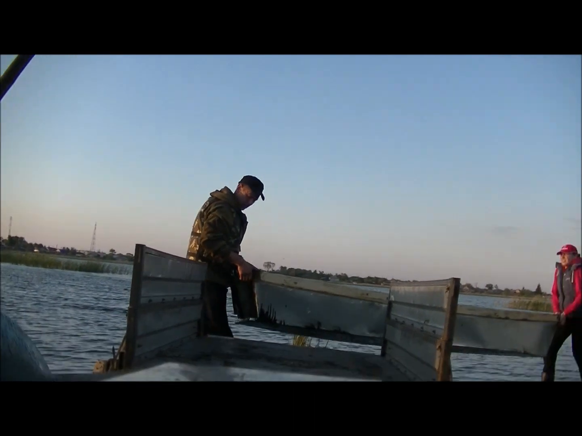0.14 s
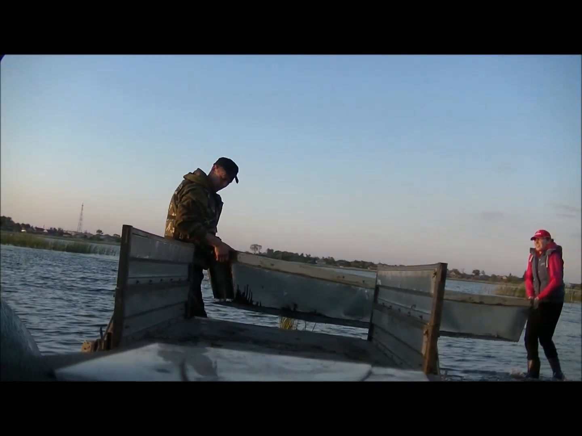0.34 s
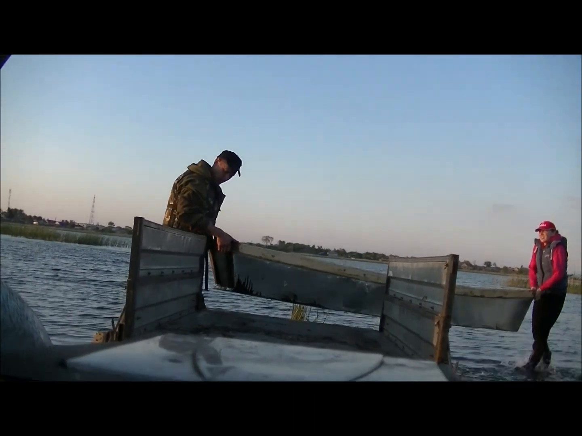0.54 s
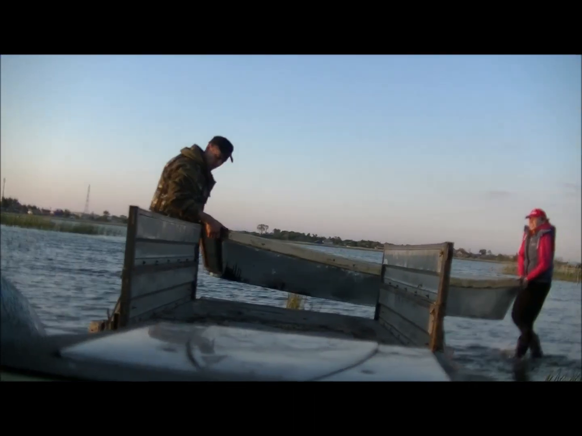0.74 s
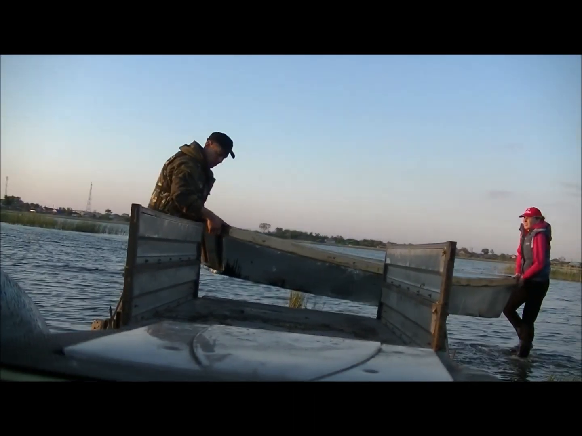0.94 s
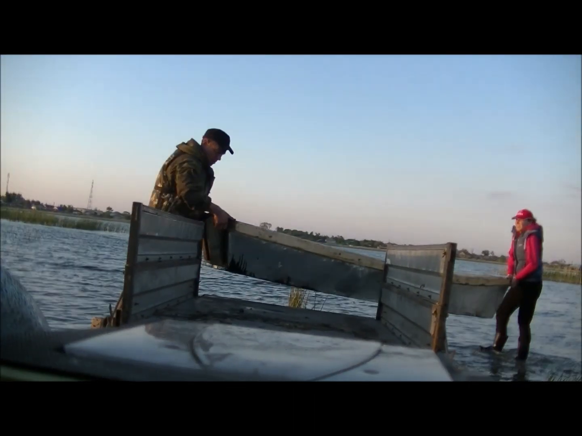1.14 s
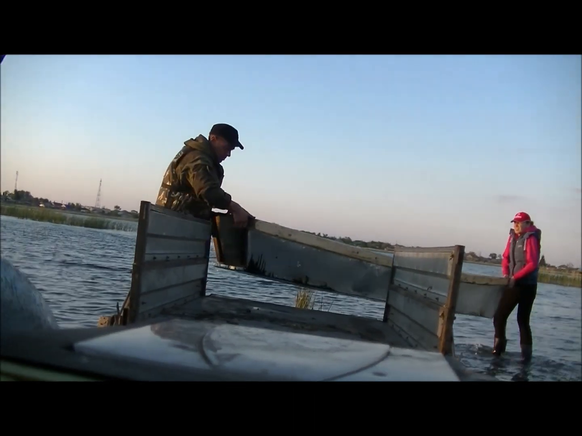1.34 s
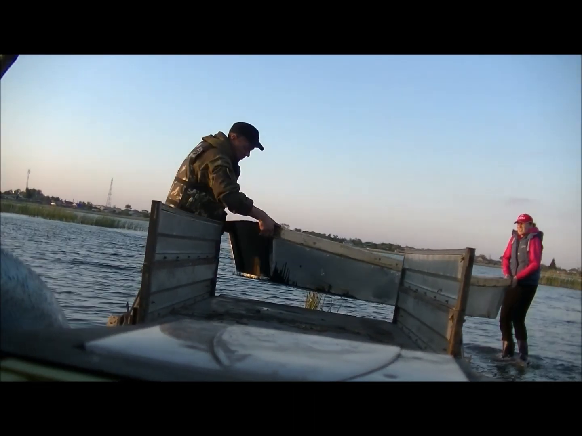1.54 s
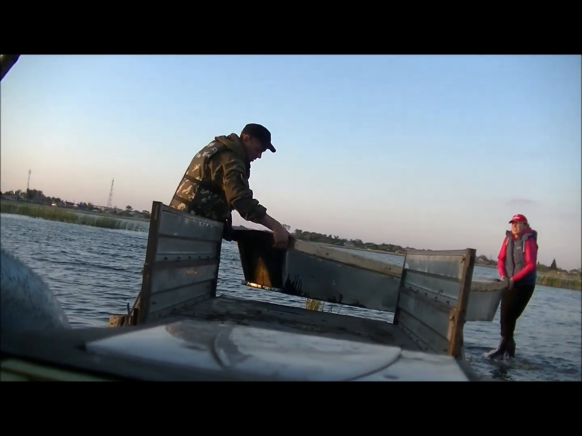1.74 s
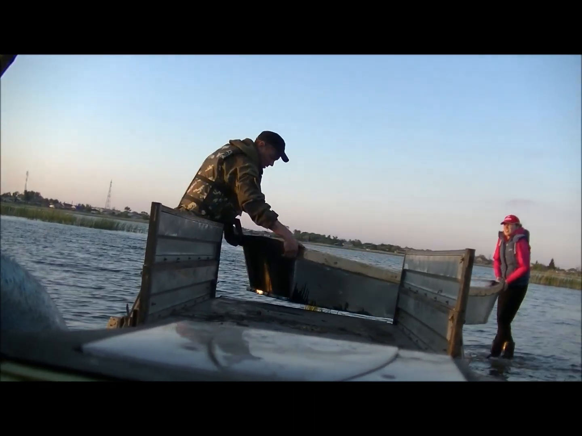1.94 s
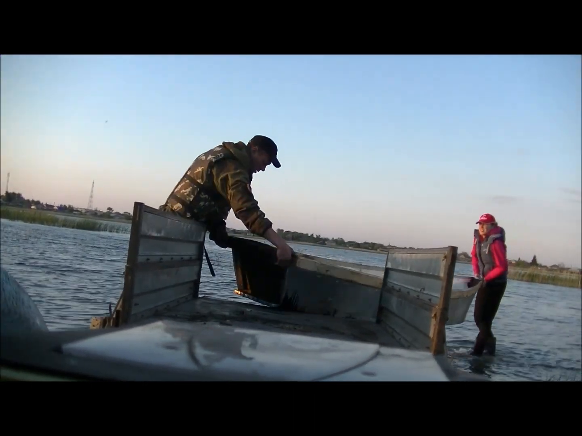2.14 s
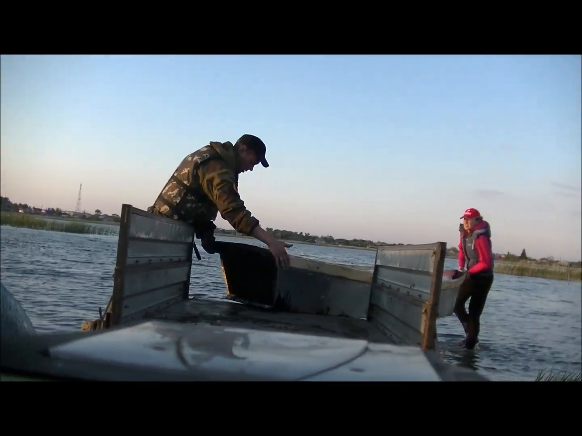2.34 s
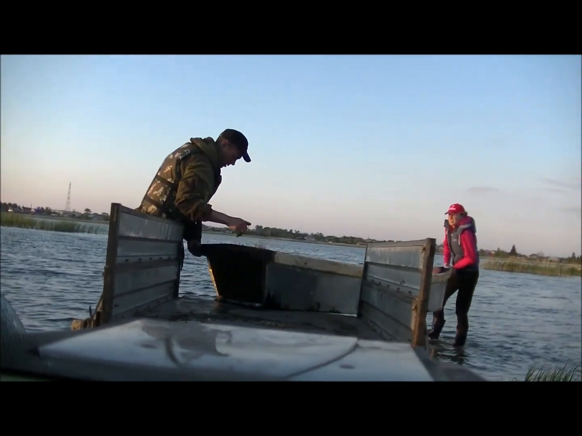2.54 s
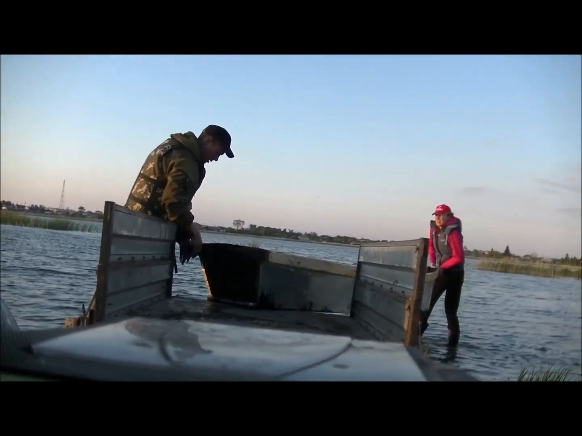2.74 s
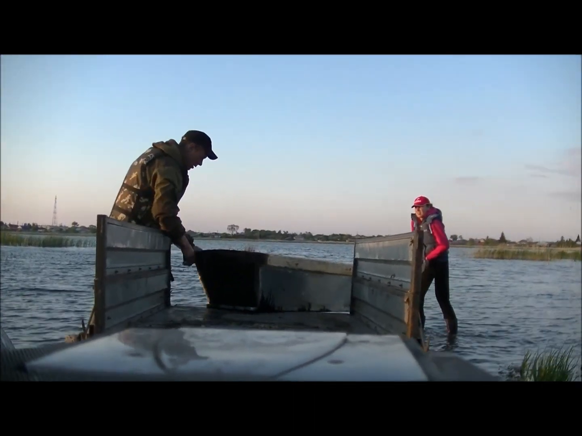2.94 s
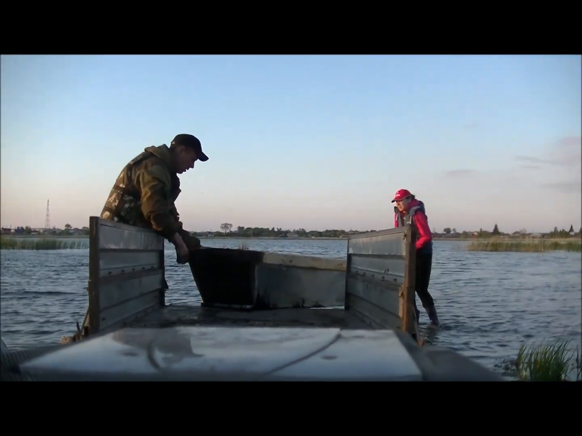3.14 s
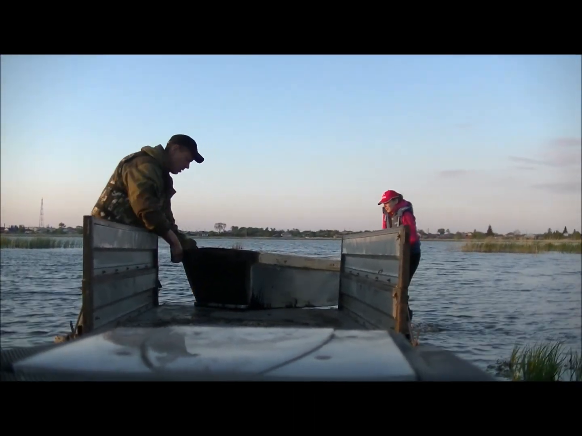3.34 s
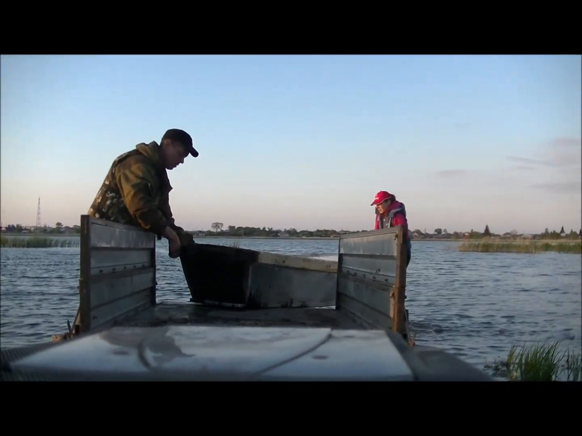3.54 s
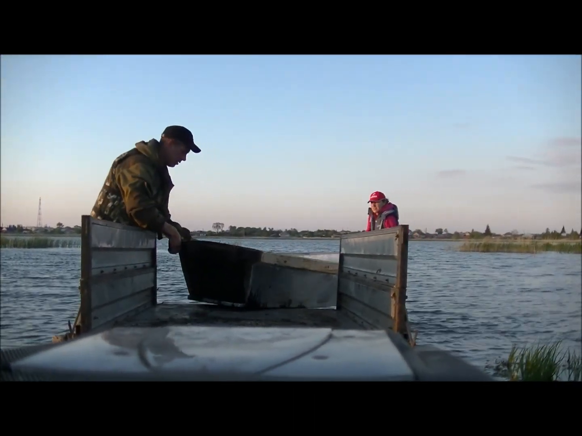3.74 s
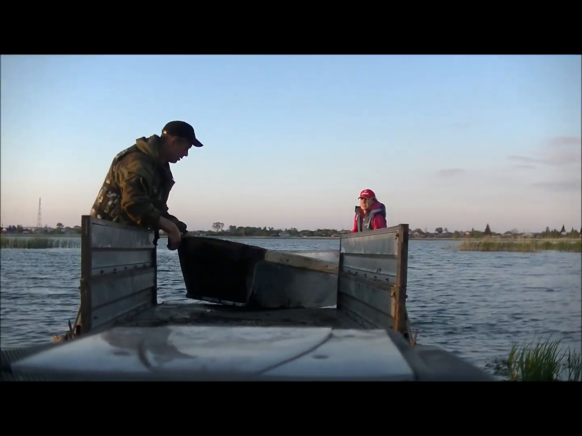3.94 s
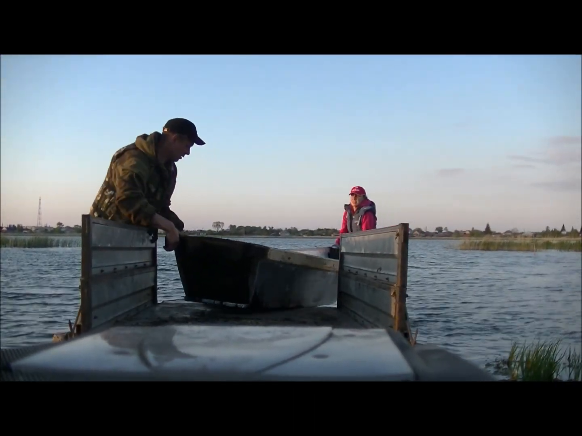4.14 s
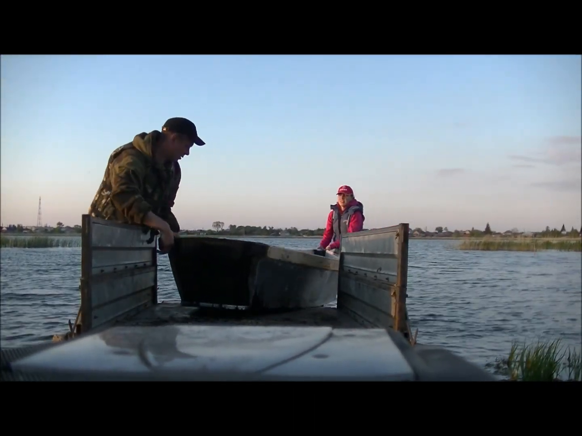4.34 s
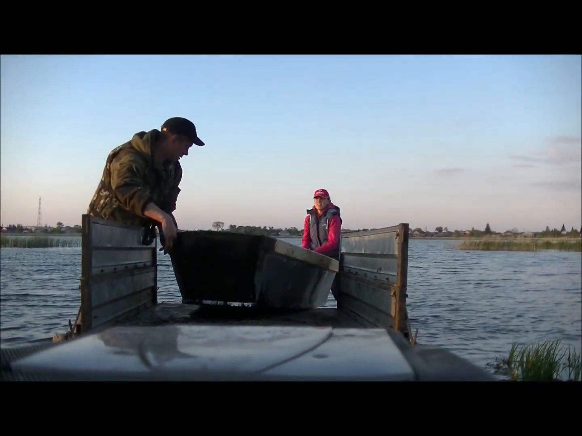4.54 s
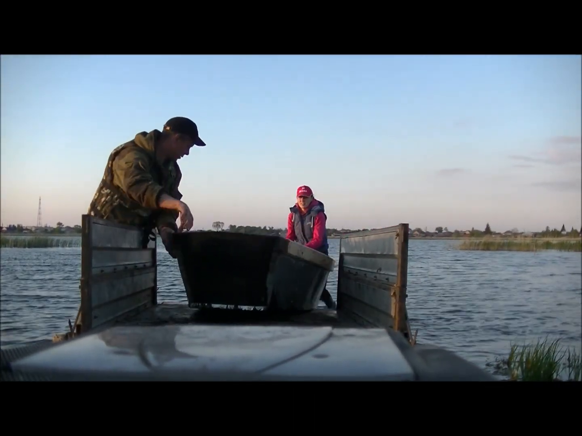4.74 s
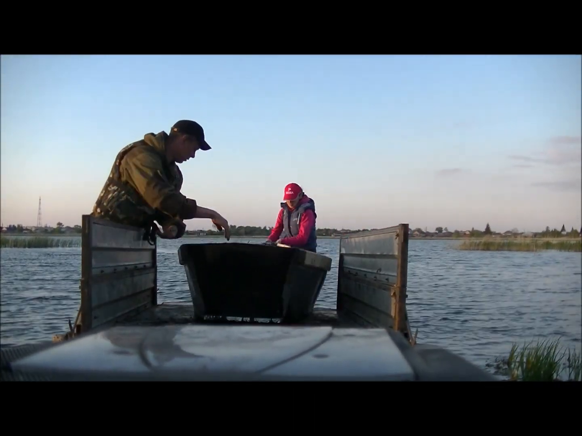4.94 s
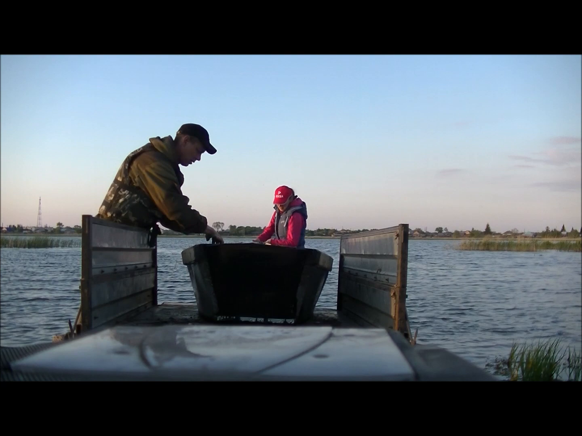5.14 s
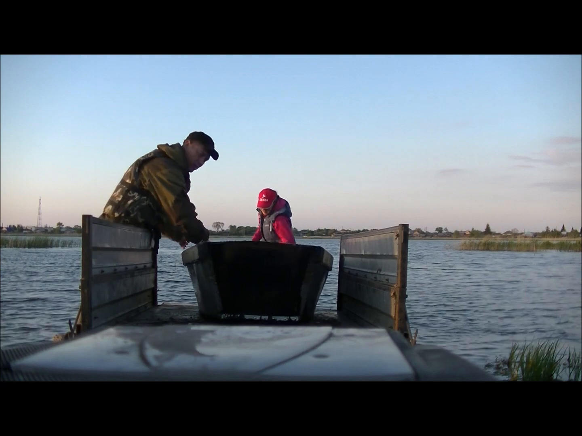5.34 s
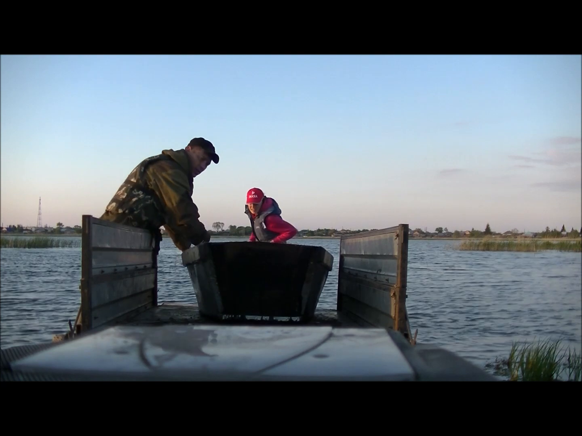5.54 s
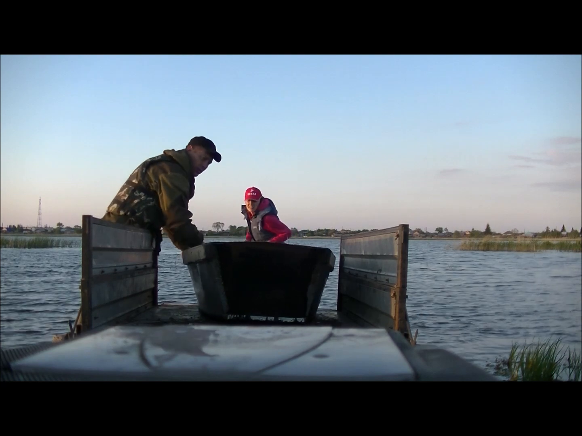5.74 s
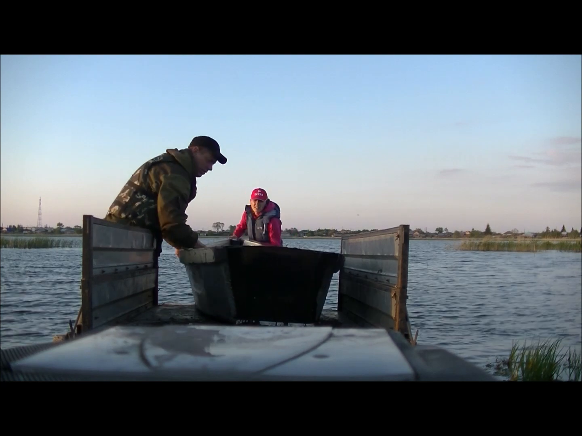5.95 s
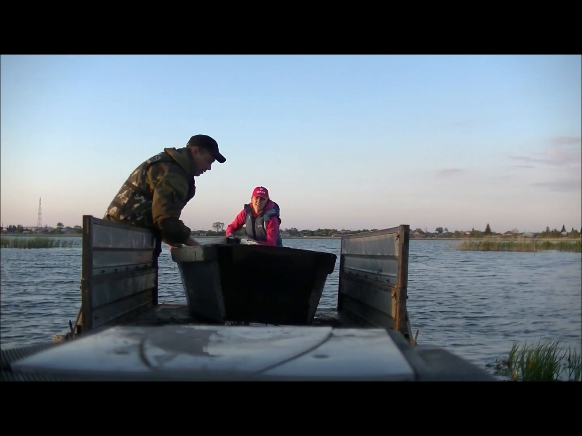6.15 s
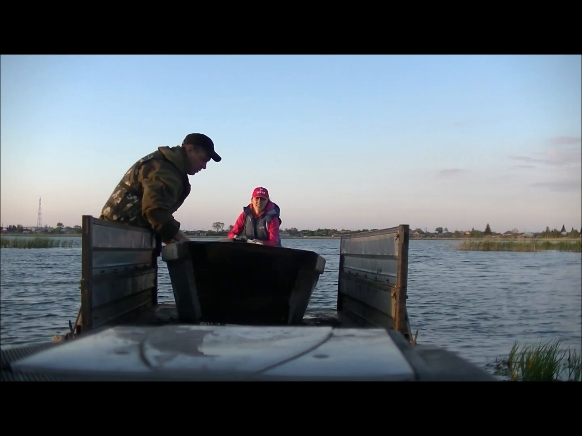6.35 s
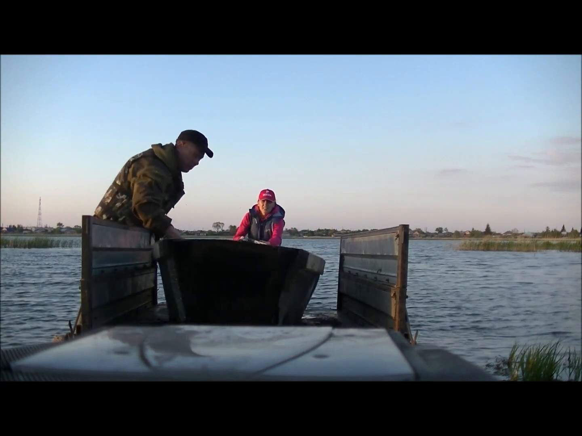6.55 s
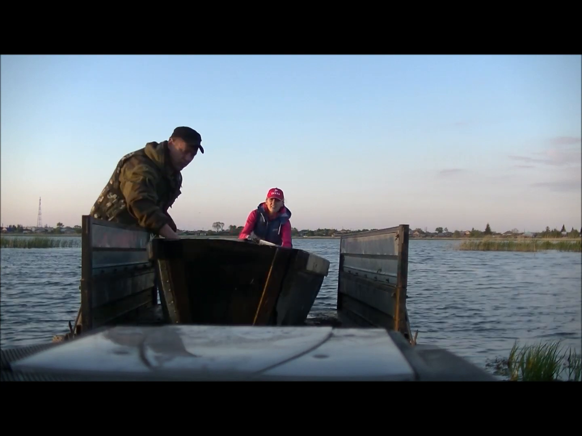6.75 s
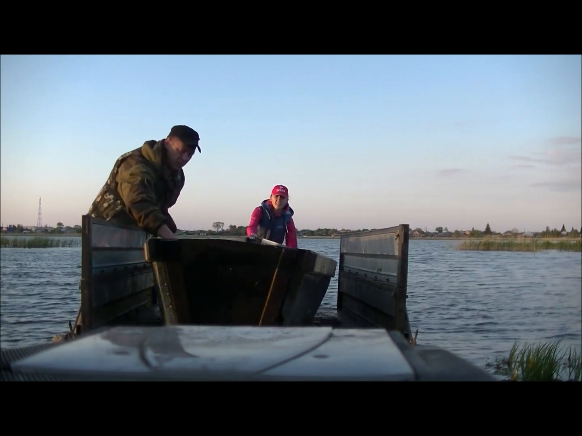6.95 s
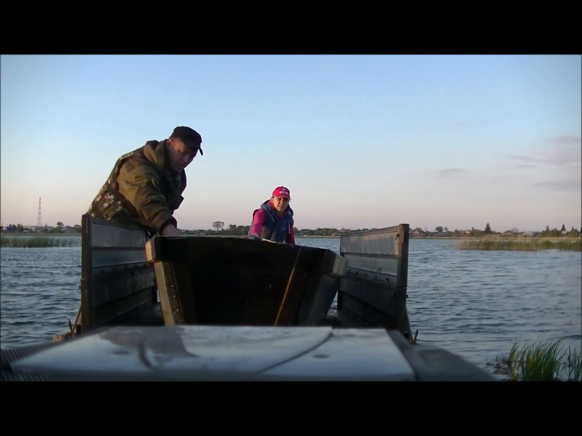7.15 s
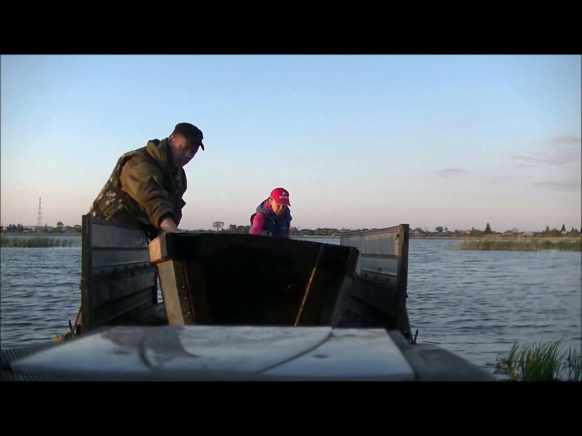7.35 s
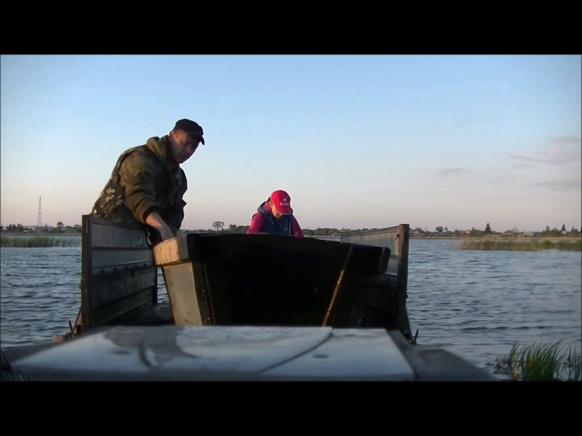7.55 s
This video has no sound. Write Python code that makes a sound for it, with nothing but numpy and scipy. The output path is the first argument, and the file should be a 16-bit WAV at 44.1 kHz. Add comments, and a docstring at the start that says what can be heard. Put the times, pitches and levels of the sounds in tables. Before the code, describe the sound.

Outdoors in shallow water, surges splash and gulp around a large hollow box. At about two seconds it hits a metal floor with a loud clank and clatter. Short mid-high squeaks follow as the water fades, then knocks and gritty scraping in two pulls, growing heavier until loud hollow bumps and a ragged rubbing groan end it. Close stereo microphone.

```python
"""A large hollow box, hauled out of shallow water, is dragged over the metal floor of a boat: crushed grit
drives its panel resonances, it grinds nearer and ends in a loud rubbing groan of ragged friction tones.
Before that, water sloshes as coloured grains and ringing bubbles, the box drops with a clatter of noise bursts,
and its bottom squeaks in short gliding slips. Two microphone channels, less alike in the middle register."""
import sys
import numpy as np
from scipy import signal
from scipy.fft import rfft, irfft, next_fast_len
from scipy.io import wavfile
from scipy.ndimage import uniform_filter1d

SR = 44100
rng = np.random.default_rng(int(sys.argv[2]) if len(sys.argv) > 2 else 0)


def generate_wav(sig):
    """Save sig (samples, or channels by samples) to the path in sys.argv[1] as 16-bit PCM at SR."""
    pcm = np.round(np.clip(np.atleast_2d(sig).T, -1, 1) * 32767).astype(np.int16)
    wavfile.write(sys.argv[1], SR, pcm)


N = 338908
TIME = np.arange(N) / SR

# Source levels in the tables are relative: each source's function trims them.
# likeness of the left and right microphone: f/Hz, likeness (0 to 1)
CHANNEL_LIKENESS = [(60, .6), (150, 0.97), (350, 0.94), (1000, 0.89), (2200, 0.82), (4500, 0.83),
                    (7000, 0.96), (10000, 1)]
# lean of the stereo picture: f/Hz, left minus right level/dB
CHANNEL_LEAN = [(60, .5), (240, 0), (480, 2), (950, 3.5), (1900, -2), (3800, -1), (6000, 0)]
CUTOFF_HZ = 15800

# spectrum of the water: f/Hz, level/dB per Hz
WATER_SPECTRUM = [(35, -70), (60, -47), (469, -15), (566, -12.5), (785, -7.5), (903, -10), (1380, 1),
                  (1740, 2), (1910, 3.5), (2470, 1.5), (3190, 3.5), (4320, 2.5), (5860, -14), (6740, -15.5),
                  (16000, -30.5)]
# surges against box and legs: crest t/s, rise t/s, fall t/s, slosh level/dB, splash level/dB
WATER_SURGES = [(0.0, .05, 0.19, -69, -45), (0.11, 0.076, 0.072, -52.5, -44.5),
                (0.23, 0.059, 0.058, -67, -38), (0.34, 0.052, 0.29, -51, -50.5),
                (0.51, 0.055, 0.11, -54, -40), (0.64, 0.075, 0.24, -44, -48.5),
                (0.84, 0.38, 0.2, -59, -45.5), (1.0, 0.082, 0.19, -55, -43.5),
                (1.17, 0.23, 0.19, -64, -44.5), (1.34, 0.071, 0.033, -58, -43.5),
                (1.405, 0.031, 0.02, -41.5, -38.5), (1.567, 0.0091, 0.19, -51, -44.5),
                (1.77, 0.075, 0.86, -50, -42), (2.02, 0.11, 0.38, -43.5, -47),
                (2.43, 0.15, 0.23, -42.5, -46), (2.76, 0.095, 0.095, -43, -47.5),
                (3.02, 0.19, 0.11, -51, -50), (3.36, 0.3, .3, -45.5, -46), (3.62, 0.091, .15, -52, -52)]
SURGE_DROP_DB = 11.5   # below the crest, one rise before and one fall after it
LAPPING_DB, LAPPING_END_S = -57, 3.78   # small waves between the surges; all water has faded by the end
SPRAY_DB, SPRAY_FOLLOWS = -53.5, 0.62   # spray at the typical splash level; share of the splash's dB swing
TYPICAL_SPLASH_DB = -44.5
# single gulps of water: t/s, level/dB, starting f/Hz
WATER_PLOPS = [(0.091, -36, 1434), (0.107, -36, 1990), (0.154, -36, 1347), (0.158, -39, 970),
               (0.316, -39, 726), (0.438, -40, 720), (0.629, -38, 1144), (0.654, -40, 1136),
               (0.682, -40, 1300), (0.8, -43, 1040), (0.839, -42, 980), (0.985, -43.5, 780),
               (1.374, -36, 1365), (1.42, -41, 1380), (1.544, -39, 2240), (1.562, -30, 782),
               (1.585, -35, 1355), (1.606, -41, 1880), (1.634, -31, 1500)]

# small hard ticks: t/s, level/dB, centre f/Hz, t60/s
HARD_TICKS = [(0.8121, -29, 2570, 0.009), (1.126, -21, 4600, 0.012), (1.127, -30, 11000, 0.008),
              (1.183, -24, 4310, 0.015), (1.6922, -23, 4500, 0.014), (1.819, -21, 4800, 0.0075),
              (2.064, 3, 3680, 0.015), (2.7806, -13, 3460, 0.012), (4.034, -15, 2800, 0.009),
              (5.72, -28, 2780, 0.015)]
SNAP_S, SNAP_DB = 1.0895, -7.5   # one sharp snap of a hard edge
# damped modes of the snap: f/Hz, level/dB, t60/s
SNAP_PARTIALS = [(1510, -13, 0.0059), (2900, -12, .003), (5200, -6.5, 0.0031), (6100, -9, .0025),
                 (11500, -19, .002)]
# spectrum of the blows: f/Hz, level/dB per Hz
KNOCK_SPECTRUM = [(71, -63), (120, -28), (272, -25), (314, -13.5), (473, -6), (1070, -4), (1580, 2),
                  (1680, 2), (2380, 1.5), (3820, -2.5), (5630, -25.5), (7200, -25.5), (8310, -34),
                  (13000, -39.5), (16000, -47)]
# blows of the box on the floor: t/s, level/dB, bass level/dB, treble level/dB, t60/s
FLOOR_BLOWS = [(0.135, -41, 2, -20, 0.061), (0.221, -28.5, -26, -11, 0.15), (0.949, -29, -29, -14, 0.29),
               (1.392, -32.5, -10, -5, 0.081), (1.553, -43, 6, -20, 0.06), (1.923, -18.5, -27, -15, 0.2),
               (2.062, -5, -14, -12, 0.12), (2.103, -12, -12, -27, 0.21), (2.136, -21, -9, -17, 0.19),
               (2.523, -16.5, -16, -38, 0.28), (2.532, -14, -17.5, -31, 0.17),
               (3.527, -21.5, -22, -40, 0.26), (3.764, -25.5, -16, -22, 0.13),
               (3.832, -16.5, -24, -26, 0.11), (3.939, -15.5, -19, -22, 0.15),
               (4.014, -22.5, -12, -15, 0.2), (4.054, -19, -18, -36, 0.15), (4.104, -13.5, -29, -29, 0.092),
               (4.164, -19.5, -12, -12, 0.12), (4.291, -25, -16, -7, 0.13), (4.596, -21.5, -15, -9.5, 0.22),
               (4.965, -24.5, -8, -7.5, 0.63), (5.05, -22.5, -5, -18, 0.066), (5.19, -33, -1.5, -30, 0.17),
               (5.315, -35, -2.5, -10, 0.19), (5.604, -49, 5.5, -23, 0.18), (6.182, -24, -17, -11, 0.12),
               (6.545, -24, -8, -22, 0.09), (6.716, -18.5, -34, -5, 0.26), (6.815, -19.5, -10, -23, 0.13),
               (6.971, -18, -18, -19, 0.11), (7.075, -16, -16, -19, 0.13), (7.2, -11.5, -23, -28, 0.12),
               (7.272, -13.5, -3.5, -15, 0.23)]
# hollow bumps of the box wall as it rides over ridges, and near the end the short squawk pulses of the loaded
# rubbing groan: t/s, level/dB, f/Hz, t60/s
HOLLOW_BUMPS = [(2.998, -34.5, 800, 0.022), (5.191, -27, 641, 0.09), (5.193, -26.5, 1500, 0.064),
                (6.252, -26, 754, 0.04), (6.472, -20.5, 761, 0.026), (6.55, -26.5, 614, 0.064),
                (6.725, -26, 590, 0.062), (6.82, -24.5, 554, 0.089), (6.966, -16, 813, 0.031),
                (6.973, -13, 538, 0.057), (7.076, -18, 652, 0.06), (7.181, -18.5, 797, 0.06),
                (7.199, -12, 803, 0.05), (7.266, -13.5, 950, 0.068), (7.273, -6, 800, 0.026),
                (7.282, -12, 1180, 0.05), (7.333, -19, 900, 0.033), (7.386, -7, 1294, 0.065),
                (7.459, -11, 1230, 0.063), (7.471, -8.5, 1090, 0.036), (7.486, -9.5, 1066, 0.043),
                (7.635, -20.5, 808, 0.049)]

# single grains dragged along the metal: t/s, length t/s, centre f/Hz, level/dB
GRAIN_SCRATCHES = [(2.447, 0.017, 10700, -50), (3.374, 0.032, 4430, -40.5), (3.739, 0.014, 1100, -39.5),
                   (3.919, .012, 3000, -36), (4.027, 0.01, 10500, -47), (4.058, .01, 2850, -35),
                   (4.23, 0.11, 11000, -48.5), (4.232, .025, 4500, -39.5), (4.294, .006, 2700, -35),
                   (4.324, .012, 4500, -40), (4.366, .008, 2740, -39), (4.41, 0.027, 2500, -41),
                   (4.565, .008, 3470, -40), (4.596, 0.016, 2440, -33), (4.832, .012, 2550, -37),
                   (5.053, .02, 2300, -37), (5.3, 0.039, 2700, -46), (5.987, .1, 8500, -42.5),
                   (5.993, .012, 2200, -38), (6.296, .012, 3000, -39), (6.642, .025, 2610, -34.5),
                   (6.713, 0.031, 6460, -38), (6.72, .03, 2620, -32.5), (6.85, 0.045, 4750, -34.5),
                   (6.892, 0.016, 6300, -41), (6.969, .008, 3510, -33), (7.198, .008, 2450, -28)]
# thin high squeals: start t/s, length t/s, top f/Hz, level/dB
EDGE_SQUEALS = [(1.326, 0.144, 5800, -52), (1.31, 0.163, 1930, -50), (4.996, .055, 4590, -41),
                (6.18, 0.041, 4650, -34.5)]
SQUEAL_ARCH = 0.12   # share by which the pitch lies lower at both ends

# slips of the box bottom: t/s, length t/s, starting f/Hz, level/dB,
# middle overtones re slip level/dB, top overtone re slip level/dB
BOTTOM_SLIPS = [(2.35, 0.091, 1375, -27, -13, -30), (2.494, 0.003, 1377, -26.5, -19, -32),
                (2.58, 0.035, 1347, -28.5, -22, -40), (2.694, 0.0064, 1325, -27.5, -17.5, -19.5),
                (2.79, 0.012, 1350, -33, -21, -28), (2.811, 0.0046, 1380, -30.5, -13.5, -28),
                (2.882, 0.015, 1338, -25.5, -14, -25), (2.92, 0.013, 1324, -31.5, -12, -24),
                (3.103, 0.026, 1347, -24.5, -14, -29), (3.15, 0.027, 1313, -31, -11, -15),
                (3.195, 0.0072, 1350, -32, -14, -34), (3.349, 0.005, 1382, -31, -13, -26),
                (3.37, 0.013, 1341, -26, -16.5, -28), (3.406, .008, 1345, -31, -16, -28),
                (3.45, 0.023, 1362, -41, -13, -28), (4.206, 0.0065, 1345, -35, -30, -35),
                (4.288, 0.021, 1364, -38, -13, -35), (4.622, 0.037, 1390, -39, -13, -30),
                (4.701, .01, 1403, -38, -14, -30), (4.741, 0.017, 1345, -30.5, -16.5, -30),
                (4.795, 0.056, 1353, -32.5, -12, -23), (4.878, 0.045, 1304, -37.5, -3.5, -15),
                (5.76, 0.017, 1382, -41.5, -6, -26), (5.904, 0.029, 1360, -42.5, -3, -25)]
# where the wall radiates each overtone: low f/Hz, high f/Hz
OVERTONE_BANDS = [(2400, 3000), (3650, 4350), (5050, 5300)]
SQUEAK_ATTACK_S, SQUEAK_RELEASE_T60_S = 0.015, 0.14
SQUEAK_SAG_HZ_PER_S, SQUEAK_FADE_DB_PER_S = 469, 9   # a slip loses pitch and level as it slows
SQUEAK_BREAK_HZ, SQUEAK_BREAK_S = 42, .012   # a slip breaks loose sharp and quickly settles
SQUEAK_CLEAN_S = 0.037   # time over which a clean slip turns fully ragged
# rough rubs under load: t/s, length t/s, starting f/Hz, glide in Hz per s, level/dB,
# octave re rub level/dB, panel re rub level/dB
LOADED_RUBS = [(3.837, 0.0082, 1514, 0, -24.5, -3, -30), (3.938, 0.01, 1542, 0, -26.5, 3, -17),
               (4.014, 0.098, 1495, 900, -30, -4, -12), (4.167, 0.012, 1620, 0, -32, -12, -18),
               (7.302, 0.022, 1147, 7000.5, -16, -21, -10.5), (7.355, .015, 1334, 0, -20.5, -15, -4.5),
               (7.383, 0.012, 1327, -6000, -10, -24, -17.5), (7.417, 0.024, 1244, 9000, -19, -16, -27),
               (7.452, .04, 1384, -9000, -15.5, -11, -9.5), (7.501, 0.018, 1074, -400, -18, 5, -27),
               (7.546, 0.02, 1055, -700, -26, -14, -12), (7.636, 0.034, 842, -1200, -26.5, -2, -10)]
RUB_ATTACK_S, RUB_RELEASE_T60_S = .013, 0.15

# boom of the box bottom, whose pitch shifts with the point that bears the load: t/s, f/Hz, level/dB
BOTTOM_BOOM = [(4.33, 621, -56), (4.41, 612, -41), (4.55, 689, -46), (4.7, 648, -53), (4.94, 660, -63),
               (4.99, 655, -42.5), (5.17, 634, -46), (5.21, 635.2, -42), (5.28, 645.6, -51),
               (5.45, 640, -58), (5.8, 639, -66), (6.02, 670, -45), (6.3, 650.3, -46), (6.55, 611, -42),
               (6.85, 560.3, -38.5), (7.04, 560, -41), (7.09, 635.5, -29), (7.16, 648, -30),
               (7.24, 696, -46)]
# spectrum of the dragging: f/Hz, level/dB per Hz
DRAG_SPECTRUM = [(59, -73), (100, -49), (153, -27), (302, -22), (381, -12.5), (634, -5), (950, -9.5),
                 (1330, -7.5), (2420, -4), (3250, -10), (4380, -8), (5770, -20.5), (9020, -25),
                 (10700, -24), (16000, -35)]
# resonances of box and floor: f/Hz, width f/Hz, lift level/dB
PANEL_MODES = [(154, 9.2, 4), (449.5, 7.4, -1), (538, 8.8, -7), (636, 66, 4), (782, 12, 4.5), (871, 33, 4),
               (1070, 7.1, -3), (1257, 18, 5.5), (1345, 21, 8), (1470, 180, 4.5), (1843, 15, 7),
               (2550, 26, 5), (3680, 30, -4), (4500, 1100, 1), (10560, 430, 4.5)]
# two long pulls over the floor with a rest between: t/s, rasp level/dB, grit level/dB
HAUL_LEVELS = [(3.55, -48.5, -61), (3.914, -36, -49), (4.17, -41.5, -50.5), (4.41, -38, -42.5),
               (4.8, -39.5, -49.5), (4.96, -44, -51), (5.08, -35, -47.5), (5.2, -44, -47.5),
               (5.576, -54, -61.5), (5.86, -48, -58), (6.0, -35, -44.5), (6.274, -35.5, -40),
               (6.4, -37, -42.5), (6.62, -32.5, -39), (6.79, -33.5, -44), (6.96, -31.5, -39.5),
               (7.19, -24.5, -30.5), (7.33, -33.5, -40.5), (7.43, -33, -43), (7.68, -34.5, -44)]
# the box judders while it tips onto the floor, less once it slides flat: t/s, swing level/dB
LOAD_JUDDER = [(3.6, 2), (4.3, 2.0), (5.3, 2), (5.9, 0.5), (6.7, .8), (7.2, 1)]
# the panels drone in step with the rasp, and gain weight as the box comes nearer
DRONE_RE_RASP_DB, DRONE_GAIN_DB_PER_S, DRONE_REFERENCE_S = -5.0, 0.3, 6.3
# clusters of catching grains sing briefly in the sheet
STREAK_RE_RASP_DB, STREAK_SWING_DB, STREAKS_PER_S = -4.5, 8, 22


def from_db(db):
    """Level in dB to amplitude."""
    return 10 ** (np.asarray(db) / 20)


def rms_one(x):
    """A signal scaled to rms 1."""
    return x / np.sqrt(np.mean(x ** 2) + 1e-20)


def in_time(rows, t=TIME):
    """Columns of a curve at the times t."""
    s, *columns = np.transpose(rows)
    return [np.interp(t, s, c) for c in columns]


def during(rows, fade, t=TIME):
    """One while a curve lasts, fading outside it."""
    inside = np.minimum(t - rows[0][0], rows[-1][0] - t)
    return np.clip(1 + inside / fade, 0, 1)


def at_hz(points, hz):
    """A spectrum read on a log-frequency axis."""
    f, value = np.transpose(points)
    return np.interp(np.log(hz + 1), np.log(f), value)


def drift(rate, size=N):
    """Smooth chance of spread 1, with this many new values a second."""
    steps = np.arange(size) * rate / SR
    count = int(steps[-1]) + 2
    return rms_one(np.interp(steps, np.arange(count), rng.standard_normal(count)))


def noise(size):
    """White noise of spread 1."""
    return rng.standard_normal(size)


def band(x, low_hz, high_hz):
    """Only what lies between two frequencies."""
    sos = signal.butter(2, [low_hz, min(high_hz, SR * .45)], "band", fs=SR, output="sos")
    return signal.sosfilt(sos, x + 1e-18)


def ring(x, hz, t60):
    """A damped resonator: a unit click sets a sine of starting height 1 ringing."""
    r, w = from_db(-60 / (t60 * SR)), 2 * np.pi * hz / SR
    return signal.lfilter([0, np.sin(w)], [1, -2 * r * np.cos(w), r * r], x + 1e-18)


def add(out, s, sound):
    """Mix a sound in at time s."""
    i = max(0, round(s * SR))
    out[..., i:i + sound.shape[-1]] += sound[..., :max(0, N - i)]


def grains(per_s, spread_db):
    """Random tiny impacts of uneven size; rms 1."""
    sizes = from_db(spread_db * np.minimum(rng.exponential(1, N), 4)) * rng.choice([-1, 1], N)
    return rms_one(sizes * (rng.random(N) < per_s / SR))


def swarm(births, pitches, cycles):
    """Random impulses dealt to resonators that each ring for some cycles; rms 1."""
    dealt = rng.integers(0, len(pitches), N)
    rings = sum(ring(births * (dealt == k), hz, cycles / hz) * np.sqrt(hz) for k, hz in enumerate(pitches))
    return rms_one(band(rings, .87 * min(pitches), 7600))


def registers(force, colour, resonances=()):
    """A force coloured by a body, in stereo, as its low, middle and high register of rms 1 each."""
    size = len(force)
    padded = next_fast_len(size)
    hz = np.arange(padded // 2 + 1) * SR / padded
    db = at_hz(colour, hz) + sum(lift / (1 + (2 * (hz - f) / width) ** 2) for f, width, lift in resonances)
    # the two channels share the force; independent noise makes them differ
    alike = np.clip(at_hz(CHANNEL_LIKENESS, hz), 0, 1)
    channels = np.array([[1], [-1]])
    mid, side = rfft(rms_one(force), padded), rfft(noise(size), padded)
    both = np.sqrt(1 + alike) * mid + np.sqrt(1 - alike) * side * channels
    both = both * from_db(db + channels * at_hz(CHANNEL_LEAN, hz) / 2)
    low, high = 1 / (1 + (hz / 1100) ** 4), 1 - 1 / (1 + (hz / 5600) ** 8)
    return [rms_one(irfft(both * share, padded)[:, :size]) for share in (low, 1 - low - high, high)]


def hollow(x, t60, wet_db):
    """Dense short reflections between the metal walls; the channels differ a little, below the treble."""
    t = TIME[:SR // 4]
    tails = noise(len(t)) + 0.42 * band(noise((2, len(t))), 93, 6600)
    tails = tails * from_db(-60 * t / t60)
    tails /= np.sqrt(np.sum(tails ** 2, axis=1, keepdims=True))
    return x + from_db(wet_db) * signal.fftconvolve(x[None], tails, axes=1)[:, :len(x)]


def evened(x):
    """A sound with its slow level swings taken out."""
    return x / np.sqrt(uniform_filter1d(np.mean(x ** 2, axis=0), size=900) + 1e-9)


def stroke(t, length, attack, release_t60):
    """Swell up to time zero, hold for a length, then die away."""
    return np.clip(1 + t / attack, 0, 1) ** 2 * from_db(-60 * np.maximum(t - length, 0) / release_t60)


def haul():
    """Levels in dB of the panel drone, the rasp and the grit."""
    rasp_db, grit_db = in_time(HAUL_LEVELS)
    nearer_db = DRONE_GAIN_DB_PER_S * (TIME - DRONE_REFERENCE_S)
    return rasp_db + DRONE_RE_RASP_DB + nearer_db, rasp_db, grit_db


def rumble(floor_db=-93, follow_db=-48):
    """A faint, lumpy low shudder that grows with the dragging."""
    shudder = rms_one(band(noise(N) + 1.2 * noise((2, N)), 25, 120))
    level = from_db(floor_db) + from_db(haul()[0] + follow_db) * during(HAUL_LEVELS, .2)
    return shudder * from_db(3 * drift(12)) * level


def water():
    """Water surges and drains; splashes crackle, and a swarm of bubbles rings inside the slosh."""
    slosh = splash = from_db(LAPPING_DB)
    for s, rise, fall, slosh_db, splash_db in WATER_SURGES:
        away = np.where(TIME < s, ((TIME - s) / rise) ** 2, (TIME - s) / fall)
        swell = from_db(-SURGE_DROP_DB * np.minimum(away, 12))
        slosh = np.hypot(slosh, swell * from_db(slosh_db))
        splash = np.hypot(splash, swell * from_db(splash_db))
    spray = from_db(SPRAY_DB) * (splash / from_db(TYPICAL_SPLASH_DB)) ** SPRAY_FOLLOWS
    low, middle, high = registers(grains(9000, 2.8) * from_db(1.97 * drift(60)), WATER_SPECTRUM)
    out = low * slosh + middle * splash * from_db(-1.1) + high * spray
    bubbles = swarm(grains(300, 4.4), np.geomspace(750, 4800, 32), cycles=80)
    out += bubbles * splash * from_db(-5.0)
    return out * np.clip((LAPPING_END_S - TIME) / 0.23, 0, 1)


def plops(t60=0.082):
    """Large bubbles rise in pitch as they die away."""
    out, t = np.zeros(N), TIME[:SR // 8]
    for s, db, hz in WATER_PLOPS:
        add(out, s, from_db(db - 0.5 - 60 * t / t60) * np.sin(2 * np.pi * hz * (t + 1.02 * t * t)))
    return hollow(band(out, 670, 4000), t60=0.04, wet_db=-2.5)


def ticks():
    """Hard edges tap with a short bright crack of decaying noise."""
    out, t = np.zeros(N), TIME[:SR // 16]
    for s, db, hz, t60 in HARD_TICKS:
        crack = from_db(db - 4.0 - 60 * t / t60) * noise(len(t))
        bright, broad = band(crack, 0.78 * hz, 1.11 * hz), band(crack, 1100, 5800)
        add(out, s + 0.000943, bright + from_db(-11.0) * broad)
    return hollow(out, t60=0.024, wet_db=1.0)


def snap():
    """A single hard contact rings a few heavily damped modes at once, dry and bright."""
    click = np.zeros(N)
    click[round(SNAP_S * SR)] = from_db(SNAP_DB)
    # neighbouring modes start with opposite sign
    modes = sum((-1) ** k * from_db(db) * ring(click, hz, t60) for k, (hz, db, t60) in enumerate(SNAP_PARTIALS))
    return hollow(band(modes, 950, 16000), t60=0.03, wet_db=-13)


def scratches(attack=0.0087, release_t60=0.078, judder_db=1.0):
    """A trapped grain skips over the metal in a brief bright scratch."""
    out, t = np.zeros(N), TIME[:SR // 5]
    for s, length, hz, db in GRAIN_SCRATCHES:
        skips = noise(len(t)) * from_db(judder_db * drift(283, len(t)))
        skips = rms_one(band(skips, 0.81 * hz, 1.085 * hz))
        add(out, s - attack, skips * from_db(db) * stroke(t - attack, length, attack, release_t60))
    return out


def squeals(jitter=0.004, flutter_db=1.5):
    """Thin whistles of a rubbing edge; pitch and level arch with the pressure."""
    out, t = np.zeros(N), TIME[:SR // 5]
    for s, length, top_hz, db in EDGE_SQUEALS:
        pressure = np.sin(np.pi * np.clip(t / length, 0, 1))
        hz = top_hz * (1 - SQUEAL_ARCH * (1 - pressure) ** 3)
        whistle = np.sin(2 * np.pi * np.cumsum(hz * (1 + jitter * drift(660, len(t)))) / SR)
        level = from_db(db + flutter_db * drift(150, len(t))) * np.sqrt(np.abs(pressure))
        add(out, s, whistle * level)
    return hollow(out, t60=0.051, wet_db=-2)


def bumps():
    """The box wall flexes and booms briefly as it rides over a ridge; in the final groan, stick-slip squawks
    give short hollow pulses of the same kind."""
    out, t = np.zeros(N), TIME[:SR // 6]
    for s, db, hz, t60 in HOLLOW_BUMPS:
        add(out, s, from_db(db - 1.5 - 60 * t / t60) * np.sin(2 * np.pi * hz * t))
    return hollow(band(out, 570, 1480), t60=0.1, wet_db=-3.5)


def knocks(attack=0.0031, tail_db=-24, tail_t60=0.87, clank_db=-1, clank_hz=4050):
    """Each blow is a crash of crowded sheet modes; the treble dies first and the floor rings on."""
    out, t = np.zeros((2, N)), TIME[:SR // 2]
    for s, db, bass_db, treble_db, t60 in FLOOR_BLOWS:
        low, middle, high = registers(noise(len(t)), KNOCK_SPECTRUM, PANEL_MODES)
        dying = from_db(-60 * t / t60)
        body = dying + from_db(tail_db - 60 * t / tail_t60)
        crash = (low * from_db(bass_db + 8.5) + middle) * body + high * from_db(treble_db + 3.5) * dying
        # the harder the blow, the more the bare metal clanks
        clank = rms_one(band(noise(len(t)), clank_hz - 800, clank_hz + 700)) * dying ** 1.32
        crash += clank * from_db(clank_db + db + 9.0)
        add(out, s, from_db(db - 12) * crash * np.minimum(t / attack, 1))
    return out


def squeaks(jitter=0.0065, flutter_db=4.0, beating_db=3.0, chatter=0.27, waver_hz=11,
            third_db=-9, skirt_db=-15, smear=0.52):
    """Stick and slip at a sagging pitch, clean at first; then echoes beat and the overtones break up."""
    out, t = np.zeros((2, N)), TIME[:SR // 3] - SQUEAK_ATTACK_S
    size = len(t)
    ragged = np.clip(t / SQUEAK_CLEAN_S, .15, 1)
    for s, length, start_hz, db, overtone_db, top_db in BOTTOM_SLIPS:
        slid = np.clip(t, 0, length)
        breaking = SQUEAK_BREAK_HZ * np.exp(-(t - t[0]) / SQUEAK_BREAK_S)
        hz = start_hz + breaking - SQUEAK_SAG_HZ_PER_S * slid + waver_hz * drift(66.0, size)
        phase = 2 * np.pi * np.cumsum(hz * (1 + jitter * drift(364, size))) / SR
        phase += chatter * ragged * drift(420, size)
        squeak = evened(hollow(np.sin(phase), t60=0.25, wet_db=-3))
        squeak = squeak * from_db(beating_db * ragged * drift(132, size))
        # uneven slips smear the overtones more than the fundamental
        partials_db = (overtone_db + 3.5, overtone_db + third_db + 3, top_db - 1.5)
        for k, partial_db, (low_hz, high_hz) in zip((2, 3, 4), partials_db, OVERTONE_BANDS):
            partial = band(np.sin(k * phase + smear * ragged * drift(480, size)), low_hz, high_hz)
            partial = evened(hollow(partial, t60=0.074, wet_db=3))
            squeak += partial * from_db(partial_db + flutter_db * np.minimum(drift(133, size), 1.3))
        # grit under the slipping edge rasps around the two lowest partials
        skirt = np.sin(phase) + from_db(overtone_db + 12) * np.sin(2 * phase)
        skirt = band(noise(size), 60, 260) * skirt
        squeak += rms_one(skirt) * ragged * from_db(skirt_db)
        fading = from_db(db - SQUEAK_FADE_DB_PER_S * slid)
        add(out, s + t[0], squeak * fading * stroke(t, length, SQUEAK_ATTACK_S, SQUEAK_RELEASE_T60_S))
    return band(out, 980, 9000)


def groans(jitter=0.0563, judder_db=3.5, panel_hz=860):
    """Under full load the slipping turns ragged: a juddering tone wanders in pitch and shakes a panel."""
    out, t = np.zeros((2, N)), TIME[:SR // 3] - RUB_ATTACK_S
    for s, length, start_hz, glide, db, octave_db, panel_db in LOADED_RUBS:
        hz = start_hz + glide * np.clip(t, 0, length)
        phase = 2 * np.pi * np.cumsum(hz * (1 + jitter * drift(503, len(t)))) / SR
        judder = from_db(judder_db * drift(249.4, len(t)))
        tone, octave = [evened(hollow(np.sin(k * phase) * judder, t60=0.096, wet_db=1)) for k in (1, 2)]
        panel = band(noise(len(t)), panel_hz - 70, panel_hz + 70)
        panel = evened(hollow(panel, t60=0.043, wet_db=6))
        rub = tone * from_db(-3.5) + octave * from_db(octave_db - 11.0) + panel * from_db(panel_db)
        add(out, s + t[0], rub * from_db(db) * stroke(t, length, RUB_ATTACK_S, RUB_RELEASE_T60_S))
    return band(out, 490, 7000)


def boom(waver_hz=27, judder_db=3.6):
    """Friction keeps one mode of the box bottom sounding, a wavering hollow tone."""
    hz, db = in_time(BOTTOM_BOOM)
    tone = np.sin(2 * np.pi * np.cumsum(hz + waver_hz * drift(170)) / SR) * from_db(judder_db * drift(70))
    tone = evened(hollow(tone, t60=0.046, wet_db=-2))
    return tone * from_db(db - 2.5 + 2.4 * drift(40)) * during(BOTTOM_BOOM, .04)


def streaks():
    """Narrow sheet resonances flare up and drop out independently as the contact shifts; rms 1."""
    force, out = grains(1500, 2.2), 0
    for hz in np.geomspace(1150, 4700, 18) * rng.uniform(0.97, 1.03, 18):
        flare = from_db(STREAK_SWING_DB * np.minimum(drift(STREAKS_PER_S), 1.8))
        out = out + ring(force, hz, 0.057) * flare
    return rms_one(band(out, 1000, 5100))


def drag():
    """Grit crushed under the box drives its panels; the load judders and coarse grains crack."""
    drone_db, rasp_db, grit_db = haul()
    crushing = grains(11000, 2.2) * from_db(1.4 * drift(130) + in_time(LOAD_JUDDER)[0] * drift(48))
    coarse = from_db(-11.5) * grains(110, 2.4)
    low, middle, high = registers(crushing + coarse, DRAG_SPECTRUM, PANEL_MODES)
    out = low * from_db(drone_db + 0.76 * drift(40))
    out += middle * from_db(rasp_db - 0.6 + 0.92 * drift(45))
    out += high * from_db(grit_db)
    # grains that catch and let go set single sheet modes ringing
    out += swarm(grains(600, 4.4), np.geomspace(800, 3600, 30), cycles=190) * from_db(rasp_db - 5.5)
    out += streaks() * from_db(rasp_db + STREAK_RE_RASP_DB)
    # five of the low panel modes swell and fade on their own
    for hz, width, lift_db in PANEL_MODES[1:6]:
        mode = rms_one(band(noise(N), hz - width / 2, hz + width / 2))
        out += mode * from_db(drone_db + lift_db - 21.0 + 4.3 * drift(9.1))
    return out * during(HAUL_LEVELS, 0.047)


def scene():
    """All layers summed, from the background to the dragged box."""
    background = rumble() + water() + plops()
    contacts = ticks() + snap() + scratches() + squeals() + bumps() + knocks()
    return background + contacts + squeaks() + groans() + boom() + drag()


def record(dry):
    """The microphone channels lose their top in a steep elliptic low-pass."""
    return signal.sosfilt(signal.ellip(10, .1, 80, CUTOFF_HZ, fs=SR, output="sos"), dry)


dry = scene()
out = record(dry)
generate_wav(out)
```